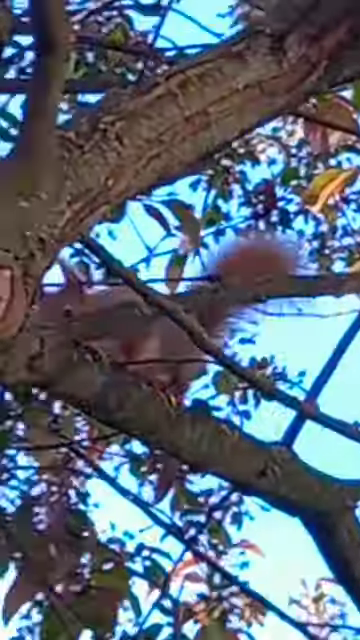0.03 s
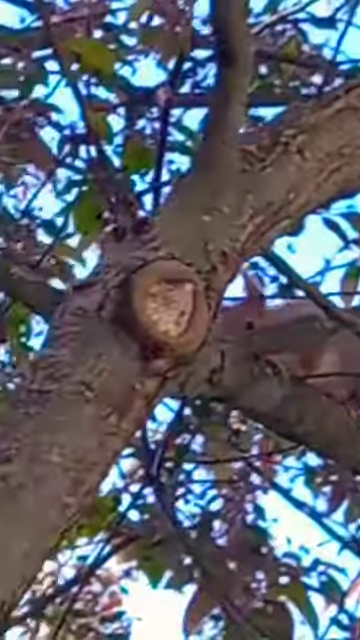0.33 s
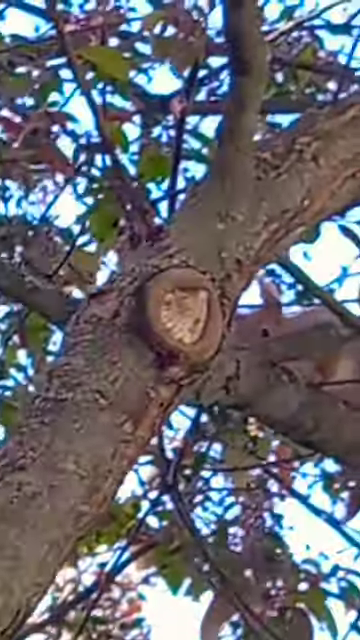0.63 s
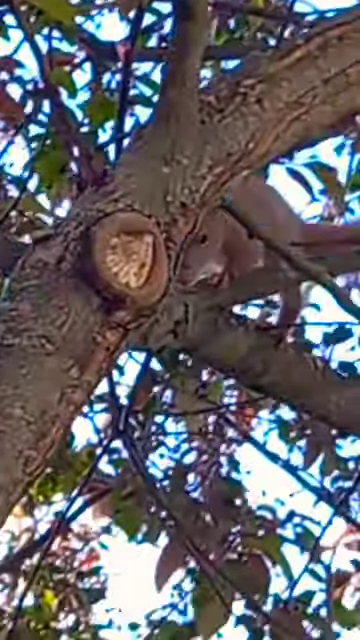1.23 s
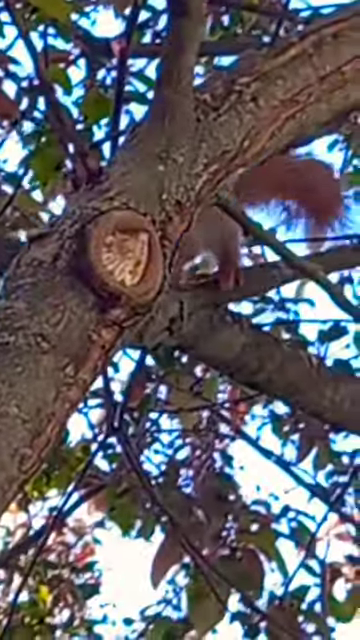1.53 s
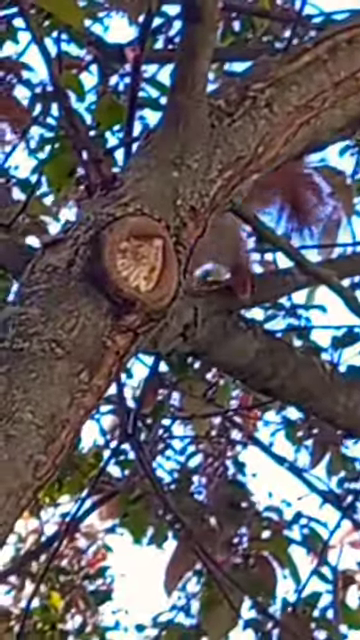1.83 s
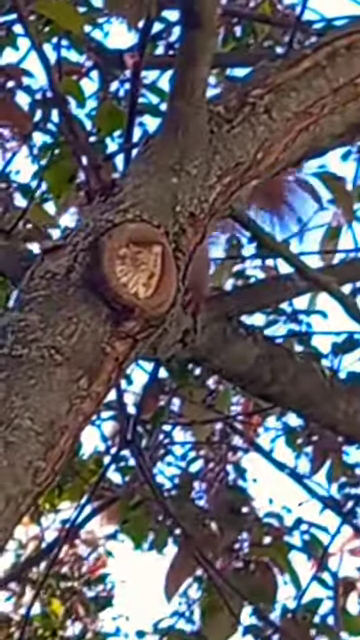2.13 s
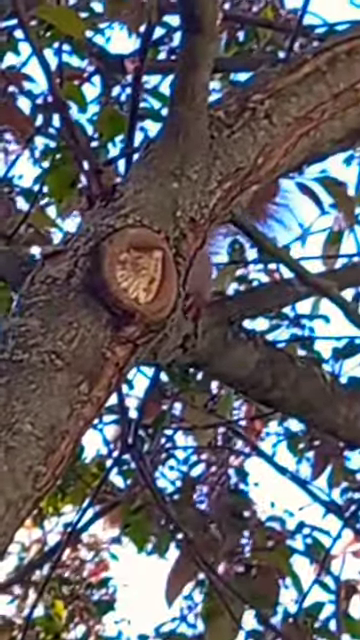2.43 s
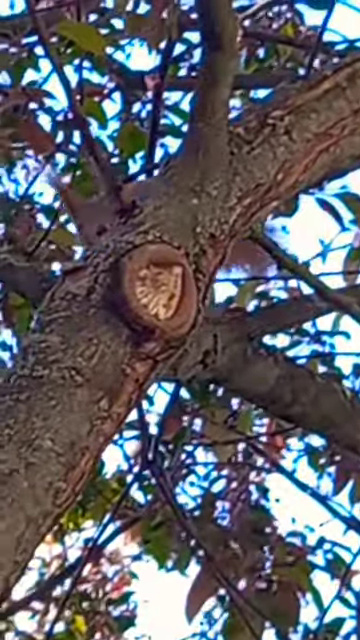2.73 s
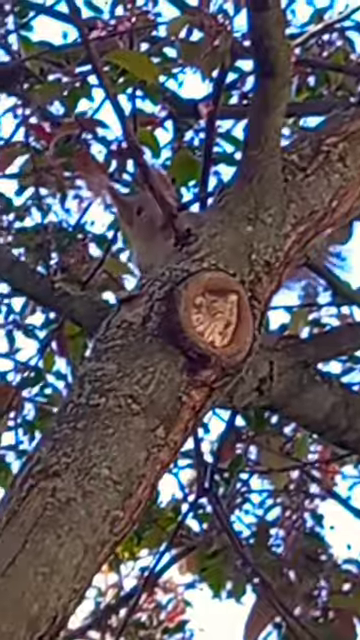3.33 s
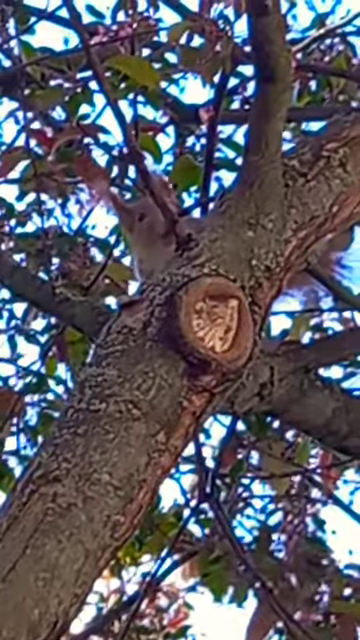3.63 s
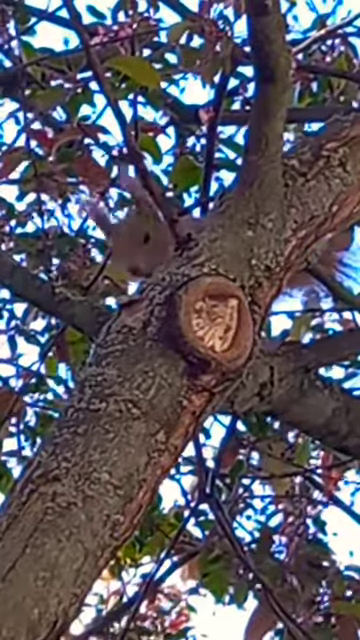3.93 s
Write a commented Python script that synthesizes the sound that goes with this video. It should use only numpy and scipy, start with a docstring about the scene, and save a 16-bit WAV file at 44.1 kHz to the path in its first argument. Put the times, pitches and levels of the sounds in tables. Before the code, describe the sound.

A squirrel scolds with quick, raspy chirps that slide up into whistles, mixed with softer squeaks, from about 0.2 to 1 second. In the pause come faint scratches, very faint distant hoots near 1.7 seconds and a small bird's falling chip at 2.2. The squirrel chirps again from 2.6 to 3.5 seconds, echoing slightly outdoors. Light wind rumbles and bumps the microphone, mostly early, over a faint rustle.

```python
"""A squirrel in a tree scolds in two bursts of bird-like chirps, and the garden echoes them.
Each chirp slides up in pitch: harsh ones rasp into a whistle, with soft squeaks between them.
In the pause come faint scratches, a small bird's falling chip and far hoots.
Light wind rumbles and bumps on the microphone, over a faint rustle and quiet outdoor air."""
import sys
import numpy as np
from scipy import signal
from scipy.fft import rfft, irfft, next_fast_len
from scipy.io import wavfile
from scipy.ndimage import map_coordinates

SR = 44100
rng = np.random.default_rng(int(sys.argv[2]) if len(sys.argv) > 2 else 0)


def wav_out(sig):
    """Save sig, one row per channel (or a flat mono array), as 16-bit PCM at SR to the path in sys.argv[1]."""
    wavfile.write(sys.argv[1], SR, np.round(np.clip(np.atleast_2d(sig).T, -1, 1) * 32767).astype(np.int16))


N = 176400
TOP_HZ = 15500  # the highest sound kept
CHIRP_TIME = np.arange(SR // 8) / SR  # seconds since a chirp began

# Tone colour of the air hissing through a chirp: pitch_hz, level_db
BREATH_COLOUR = [(3000, -40), (6000, -7.5), (9000, -12), (13000, 24.5), (15500, 3.5)]


def amp(db):
    """Turn decibels into a number to multiply by."""
    return 10 ** (np.asarray(db) / 20)


def unit(x):
    """Scale a sound to an average strength (rms) of 1."""
    return x / np.sqrt(np.mean(x ** 2) + 1e-20)


def along(points, hz):
    """Read a table of (pitch, value) rows at any pitch."""
    pitches, values = np.transpose(points)
    return np.interp(np.log(hz + 1), np.log(pitches + 1), values)


def curves(rows, t):
    """Read each column after the time column at times t."""
    times, *columns = np.transpose(rows)
    return [np.interp(t, times, column) for column in columns]


def wobble(rate, size=N):
    """A smooth curve through `rate` random values a second."""
    return map_coordinates(rng.standard_normal(2000), [np.arange(size) * rate / SR], mode="wrap")


def filtered(x, response):
    """Turn each frequency up or down by response(hz)."""
    size = next_fast_len(len(x) + 8192)
    return irfft(rfft(x, size) * response(np.fft.rfftfreq(size, 1 / SR)), size)[:len(x)]


def noise(colour, size=N):
    """Noise of strength 1 with the given tone colour."""
    return unit(filtered(rng.standard_normal(size), lambda hz: amp(along(colour, hz))))


def gate(t, rise_s, end_s, fall_s):
    """Fade in, hold, and fade out by end_s."""
    return np.sin(np.pi / 2 * np.clip(t / rise_s, 0, 1) * np.clip((end_s - t) / fall_s, 0, 1)) ** 2


def tone(hz):
    """A pure tone of strength 1 that follows a pitch curve."""
    return np.sqrt(2) * np.sin(2 * np.pi * np.cumsum(hz) / SR)


def add(out, start_s, x):
    """Mix x into out from start_s on."""
    part = out[max(round(start_s * SR), 0):][:len(x)]
    part += x[:len(part)]


def echoed(x, tail_db=-3.5, scatter_db=-7):
    """Add quick scatter from branches, the garden's tail and a far echo. Defaults suit far sounds."""
    # Time the garden's tail takes to fade by 60 dB: pitch_hz, fade_s
    fade_times = [(700, 0.9), (2000, 0.4), (3200, 0.48), (4200, 0.41), (6200, 0.49), (8400, 0.42),
                  (13000, 0.14)]
    # Tone colour of the far echo: pitch_hz, level_db
    far_colour = [(1500, -17), (3400, 10), (4300, -3), (5500, -13), (8000, -32), (13000, -36)]
    hz, t, bands = signal.stft(rng.standard_normal(SR), SR, nperseg=256)
    bands *= amp(-60 * t / along(fade_times, hz)[:, None])
    tail = signal.istft(bands, SR, nperseg=256)[1][:SR]
    t = np.arange(SR) / SR
    scatter_s, far_s = 0.1, 1.2
    scatter = rng.standard_normal(SR) * amp(-60 * t / scatter_s) * (t > 0.005)
    far = filtered(rng.standard_normal(SR), lambda hz: amp(along(far_colour, hz)))
    far_fade = amp(-60 * t / far_s)
    echo = amp(tail_db) * tail / np.linalg.norm(tail)
    echo += amp(scatter_db) * scatter / np.linalg.norm(scatter)
    echo += amp(-19.5) * far * far_fade / np.linalg.norm(far_fade)
    echo[0] += 1  # the sound that arrives directly
    return signal.fftconvolve(x, echo)


def outdoor_air():
    """A steady, very quiet hush."""
    # Tone colour of the air: pitch_hz, level_db
    colour = [(120, -9), (400, 2), (700, -3), (1200, -5), (2080, -6.5), (2500, -16.5), (3300, -17.5),
              (4200, -10), (6000, -19), (8300, -17), (15300, -23.5)]
    return amp(-78.5) * noise(colour)


def rustle():
    """A faint, flickering rustle, perhaps leaves."""
    # Loudness of the rustle: time_s, level_db
    loudness = [(0, -84), (.9, -71), (1.2, -78), (1.6, -77), (1.85, -86), (2.3, -86), (2.6, -91), (4, -91)]
    # Tone colour of the rustle: pitch_hz, level_db
    colour = [(1500, -25), (2600, -8), (3400, 1.5), (4400, 0), (5400, -6), (7000, -23), (12000, -30)]
    level_db, = curves(loudness, np.arange(N) / SR)
    return amp(level_db + 2.6 * wobble(24.7)) * noise(colour)


def wind():
    """Wind on the microphone makes an uneven rumble, a flutter and single bumps."""
    # Strength of the wind: time_s, rumble_db, flutter_db
    gusts = [(0, -37.5, -45.5), (.32, -41, -47.5), (.43, -45.5, -60), (.55, -48.5, -49), (.72, -37, -47),
             (.9, -43, -46), (1.07, -43.5, -59), (1.14, -39.5, -48.5), (1.29, -52.5, -59), (1.41, -44, -45),
             (1.57, -42.5, -49), (1.62, -50, -55), (1.79, -51, -53), (1.84, -59.5, -65.5), (2.1, -59, -89),
             (2.48, -64, -79), (2.7, -51, -61.5), (2.8, -53.5, -67), (2.93, -47, -62.5), (2.99, -63, -81),
             (3.11, -56.5, -73.5), (3.18, -75, -99), (3.29, -54, -98), (3.41, -70, -96), (3.49, -56, -107),
             (3.53, -80, -79.5), (3.61, -56.5, -75), (3.72, -69, -70), (3.75, -82, -79.5), (4, -79.5, -121)]
    # Tone colour of the deep rumble: pitch_hz, level_db
    rumble_colour = [(20, -25.5), (45, -12.5), (70, -0.5), (105, 3), (160, -4.5), (250, -14), (400, -28),
                     (800, -81), (3000, -110)]
    # Tone colour of the higher flutter: pitch_hz, level_db
    flutter_colour = [(100, -7.5), (220, 3), (330, 3), (460, -4.5), (620, -18), (850, -31.5), (1400, -46.5),
                      (4000, -79.5)]
    # Puffs that bump the microphone: middle_s, pitch_hz, level_db
    bumps = [(.354, 99.5, -26), (.506, 119, -33), (0.858, 123, -24), (1.125, 115, -46.5), (1.368, 108, -30),
             (1.504, 140.3, -31), (1.573, 103.4, -26.5), (1.91, 97, -38.5), (2.407, 118, -46),
             (2.698, 296, -42), (2.919, 162, -36.5), (3.587, 160, -38.5), (3.589, 80, -53),
             (3.706, 95, -44.5)]
    t = np.arange(N) / SR
    rumble_db, flutter_db = curves(gusts, t)
    lumps_db = 2.2 * wobble(24)
    out = amp(rumble_db + lumps_db) * noise(rumble_colour)
    out += amp(flutter_db + lumps_db + 3 * wobble(60)) * noise(flutter_colour)
    for middle_s, hz, db in bumps:
        cycles = (t - middle_s) * hz
        out += amp(db) * np.sin(2 * np.pi * cycles) / (1 + (cycles / 0.6) ** 4)  # about one swing
    return out


def far_hoots():
    """Faint hoots, each a slightly shaky tone."""
    # The hoots: start_s, length_s, pitch_hz, level_db
    hoots = [(1.575, 0.12, 1537, -76), (1.737, 0.12, 1519, -73.5), (1.921, 0.09, 1512, -72),
             (1.564, 0.096, 750, -75.5), (1.677, 0.13, 732, -75.5), (1.839, 0.13, 731.4, -71.5)]
    out, t = np.zeros(N), np.arange(SR // 4) / SR
    for start_s, length_s, hz, db in hoots:
        pitch = hz * (1 + 0.025 * wobble(200, len(t)))
        add(out, start_s, echoed(amp(db) * tone(pitch) * gate(t, 0.03, length_s, 0.03)))
    return out


def small_bird():
    """One falling chip, sung with two voices at once."""
    # Path of the lower voice: time_s, pitch_hz, level_db
    path = [(2.128, 6960, -79), (2.14, 7510, -79), (2.157, 7890, -65.5), (2.168, 5015, -64),
            (2.191, 4056, -62.5), (2.205, 3744, -74), (2.232, 3870, -68.5), (2.251, 3800, -82)]
    out, t = np.zeros(N), np.arange(SR // 4) / SR
    start_s, end_s = path[0][0], path[-1][0]
    pitch, db = curves(path, start_s + t)
    pitch *= 1 + 0.036 * wobble(1300, len(t))
    chip = amp(db) * (tone(pitch) + amp(-12) * tone(1.22 * pitch))
    add(out, start_s, echoed(chip * gate(t, 0.004, end_s - start_s, 0.008)))
    return out


def scratches():
    """Each scratch, perhaps a claw on bark, is a clump of tiny ringing ticks."""
    # The scratches: start_s, length_s, pitch_hz, level_db
    strokes = [(1.263, 0.048, 4950, -82), (1.343, 0.053, 4670, -77), (1.464, 0.0057, 4900, -65),
               (1.48, 0.022, 4860, -63), (1.552, 0.048, 4890, -78), (1.677, 0.052, 5140, -79.5),
               (1.762, 0.043, 4700, -81), (1.883, 0.039, 4860, -76), (1.932, .05, 4680, -67.5),
               (2.031, 0.039, 4800, -73), (2.293, 0.048, 5220, -72), (2.439, 0.049, 5180, -74.5),
               (2.589, .012, 5100, -72.5)]
    ticks_per_s, pitch_spread, ring_cycles = 1500, 0.11, 5
    out, t = np.zeros(N), np.arange(SR // 100) / SR
    for start_s, length_s, hz, db in strokes:
        clump = np.zeros(SR // 8)
        for k, (place, height, size) in enumerate(rng.random((80, 3))):
            if k < ticks_per_s * length_s:
                pitch_shift = np.log((height + 0.0012) / (1 - height + 0.0011)) / 2
                cycles = hz * np.exp(pitch_spread * pitch_shift) * t
                fade = np.exp(-cycles / ring_cycles) * (1 - np.exp(-cycles / 2))
                strength = amp(-3 * np.log(1 - size))  # a few ticks stand out
                add(clump, place * length_s, strength * np.sin(2 * np.pi * cycles) * fade)
        add(out, start_s, echoed(amp(db) * unit(clump) * np.sqrt(length_s * SR / len(clump))))
    return out


def rising_pitch(top_hz, climb):
    """A chirp's pitch climbs unsteadily, then settles on a slightly wavering top note."""
    share, = curves(climb, CHIRP_TIME)
    shake = (0.00081 + 0.038 * np.minimum(5 * (1 - share), 1)) * wobble(1100, len(share))
    waver = 0.007 * wobble(170, len(share))
    return top_hz * share * (1 + shake + waver)


def whistle(pitch):
    """The squirrel's lowest tone; its throat mutes the low start of the climb."""
    # What the throat lets through: pitch_hz, level_db
    throat = [(1500, -18), (2350, -12), (2700, 0)]
    return amp(along(throat, pitch)) * tone(pitch)


def overtones(pitch, top_hz, levels_db):
    """Tones at whole multiples of the pitch, swelling as it nears the top note."""
    return sum(amp(db) * tone(k * pitch) for k, db in enumerate(levels_db, 2)) * (pitch / top_hz) ** 6


def rasp(pitch):
    """The climbing voice is rough and breathy; its overtones slide through the throat's resonances."""
    # How strongly the throat rings: pitch_hz, level_db
    throat = [(1200, -33), (1900, -20), (2900, -9.5), (4000, -5), (4700, -3.5), (5500, -6.5), (6450, -2.5),
              (7100, -17.5), (8300, -19), (9200, -22), (12600, -18.5), (15300, -20)]
    t = CHIRP_TIME
    build_up = np.minimum(t / 0.033, 1) ** 2  # the high overtones come in last
    voice = np.zeros(len(t))
    for k in range(2, 10):
        hz = k * pitch
        level_db = along(throat, hz) - wobble(700, len(t))
        voice += amp(level_db) * tone(hz) * (hz < TOP_HZ) * (build_up if k > 3 else 1)
    voice += amp(-3) * noise(throat, len(t))
    breath = amp(-11.5) * noise(BREATH_COLOUR, len(t)) * gate(t, 0.061, 0.16, 0.21)
    return voice * gate(t, 0.024, 0.063, 0.028) + breath


def soft_chirps():
    """The squirrel's thin rising squeaks, with a little rasp and breath."""
    # The squeaks: start_s, top_pitch_hz, length_s, level_db
    chirps = [(0.519, 4315, 0.084, -56), (0.71, 4370, 0.074, -51), (.792, 4250, 0.056, -76),
              (2.599, 4350, 0.09, -58), (2.814, 4380, 0.077, -53), (3.015, 4300, 0.073, -54),
              (3.282, 4326, 0.071, -55.5)]
    # Rise in pitch within a squeak: time_s, share_of_top_pitch
    climb = [(0, .38), (.013, .47), (.025, .64), (.038, .83), (.048, .95), (.057, 1)]
    # Change in the voice's loudness within a squeak: time_s, change_db
    swell = [(0, -13.5), (.021, -4), (.025, -6), (.042, -1), (.058, -4.5), (.07, -0.5)]
    out, t = np.zeros(N), CHIRP_TIME
    swell_db, = curves(swell, t)
    for start_s, top_hz, length_s, db in chirps:
        pitch = rising_pitch(top_hz, climb)
        voice = amp(swell_db) * (whistle(pitch) + overtones(pitch, top_hz, levels_db=[-17.5, -15]))
        breath = amp(-26) * noise(BREATH_COLOUR, len(t)) * gate(t, 0.036, 0.14, 0.037)
        chirp = (voice + amp(-15) * rasp(pitch) + breath) * gate(t, 0.006, length_s + 0.01, 0.02)
        add(out, start_s, echoed(amp(db) * chirp, tail_db=-7, scatter_db=-2))
    return out


def harsh_chirps():
    """The squirrel's loud chirps start as a rasp and climb into a clear whistle."""
    # The chirps: start_s, top_pitch_hz, length_s, whistle_db, rasp_db
    chirps = [(0.173, 4220, 0.08, -38, -50.5), (0.341, 4190, 0.083, -31, -47.5),
              (0.589, 4152, 0.093, -33.5, -49.5), (0.864, 4251, 0.067, -32, -51.5),
              (2.73, 4198, 0.079, -34, -51.5), (2.919, 4133, 0.084, -35.5, -47.5),
              (3.138, 4206, 0.069, -35, -50.5), (3.393, 4161, 0.077, -36.5, -51)]
    # Rise in pitch within a chirp: time_s, share_of_top_pitch
    climb = [(0, .37), (.012, .46), (.025, .64), (.036, .84), (.045, .98), (.052, 1)]
    # Change in the whistle's loudness within a chirp: time_s, change_db
    swell = [(0, -47.5), (.021, -26.5), (.025, -26.5), (.043, -15.5), (.058, -10.5), (.07, -3)]
    out, t = np.zeros(N), CHIRP_TIME
    swell_db, = curves(swell, t)
    for start_s, top_hz, length_s, whistle_db, rasp_db in chirps:
        pitch = rising_pitch(top_hz, climb)
        clear = amp(whistle_db + swell_db) * whistle(pitch) * gate(t, 0.006, length_s + 0.01, 0.02)
        upper = overtones(pitch, top_hz, levels_db=[-14, -27]) * gate(t, 0.05, length_s, 0.022)
        rough = amp(rasp_db) * (upper + rasp(pitch))
        add(out, start_s, echoed(clear + rough, tail_db=-7, scatter_db=-10))
    return out


def scene():
    """The squirrel and the garden around it, mixed into one channel."""
    mix = rustle() + harsh_chirps() + soft_chirps() + scratches() + small_bird() + far_hoots()
    return (mix + wind() + outdoor_air())[None]


def record(dry):
    """Cut away everything above TOP_HZ."""
    return np.array([filtered(x, lambda hz: hz < TOP_HZ) for x in dry])


dry = scene()
out = record(dry)
wav_out(out)
```